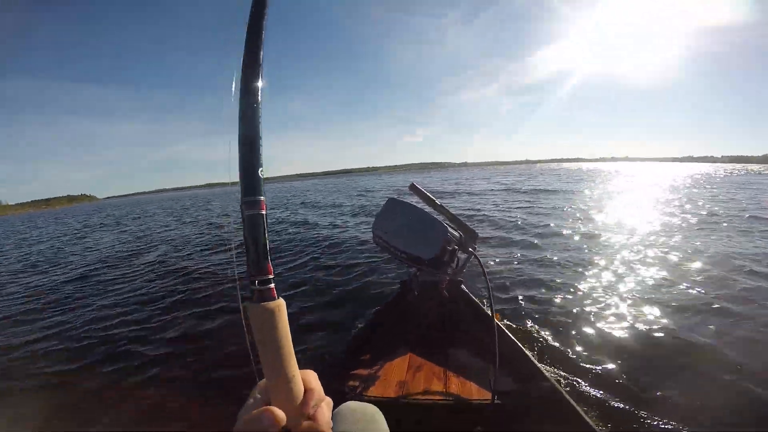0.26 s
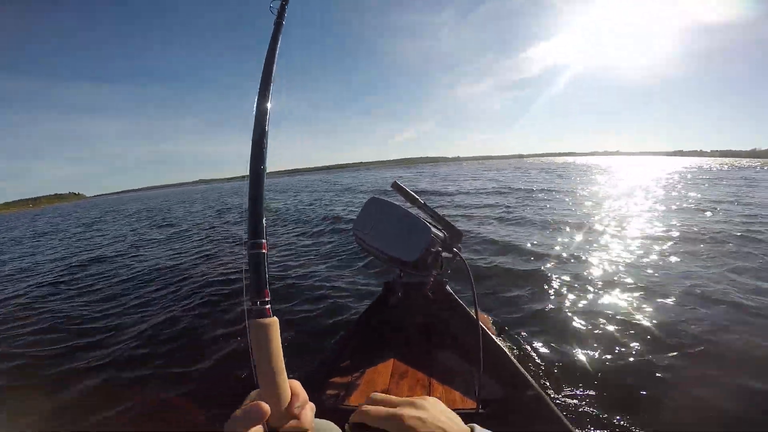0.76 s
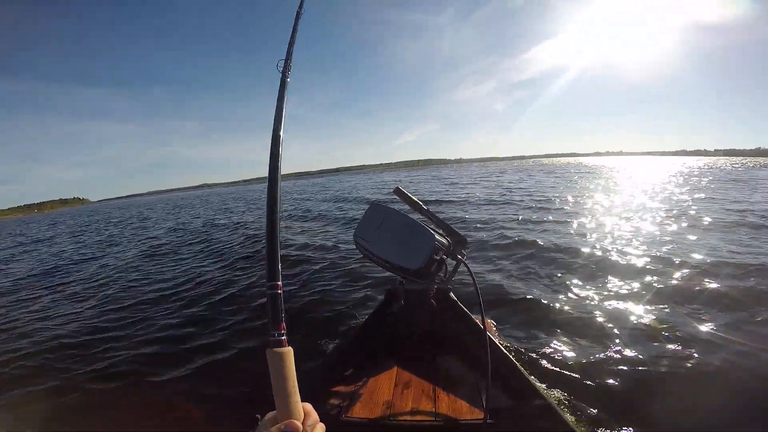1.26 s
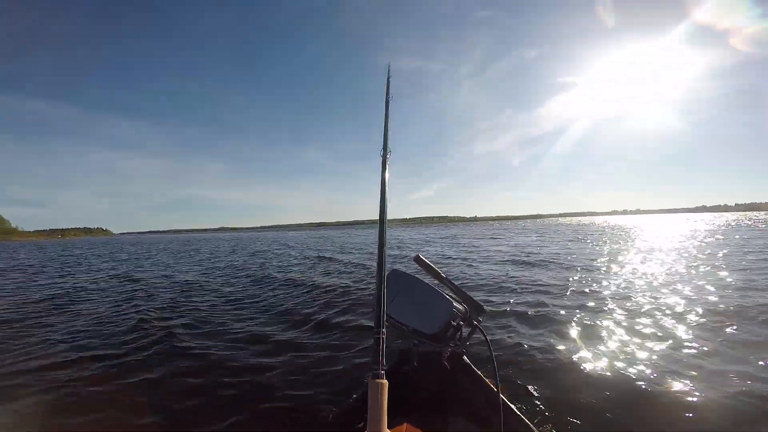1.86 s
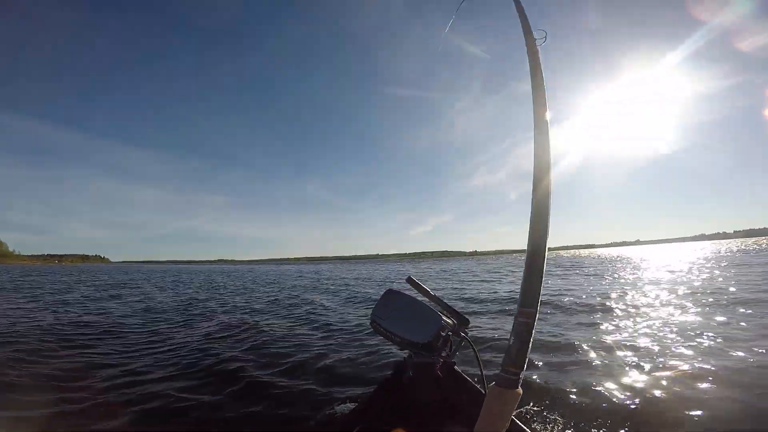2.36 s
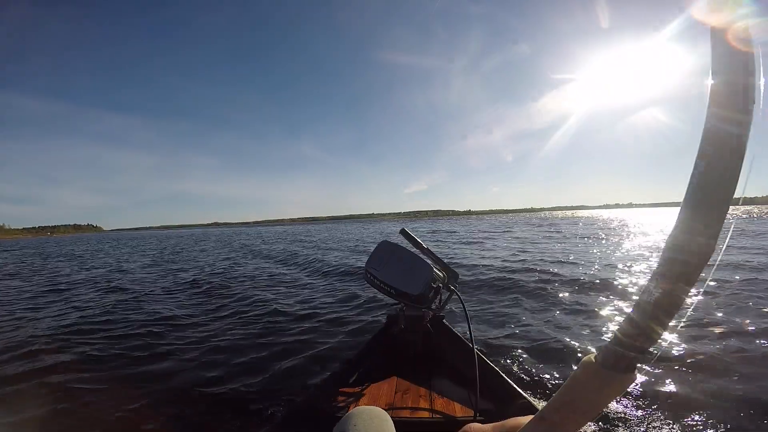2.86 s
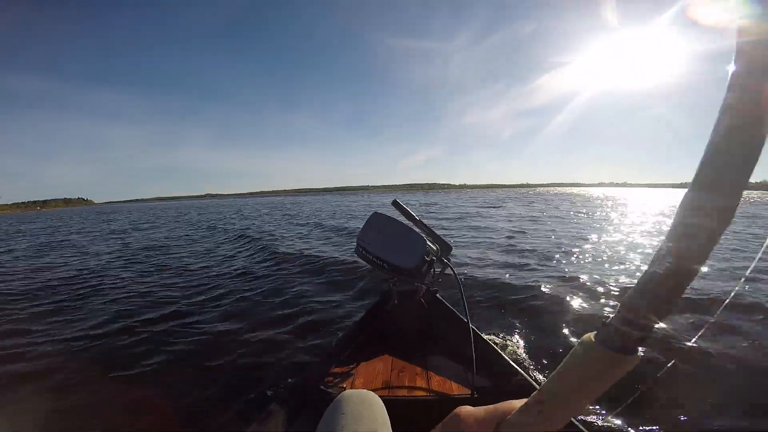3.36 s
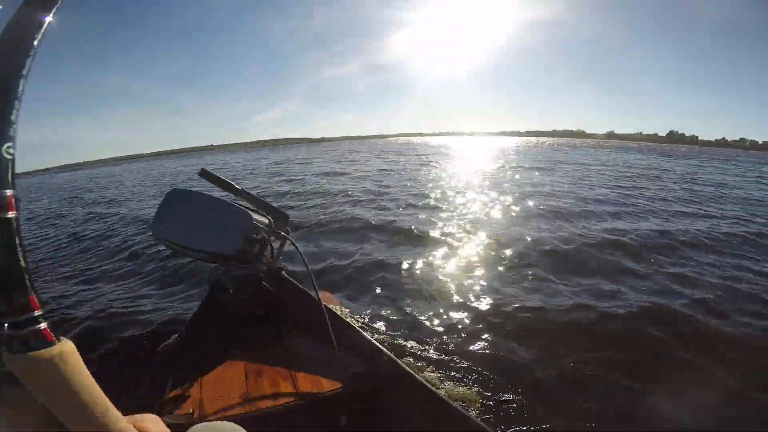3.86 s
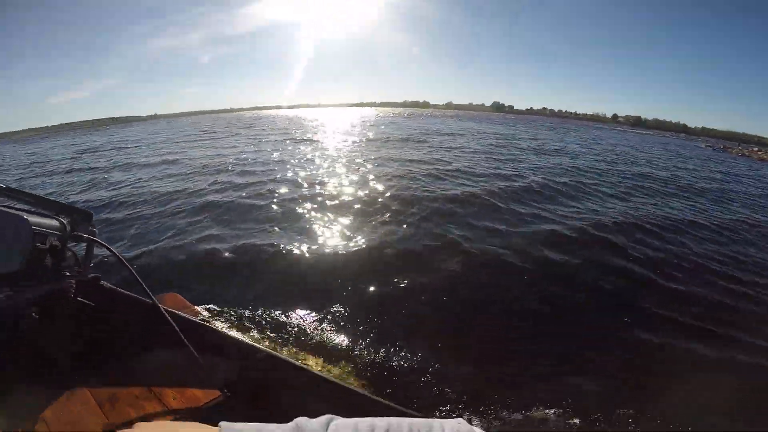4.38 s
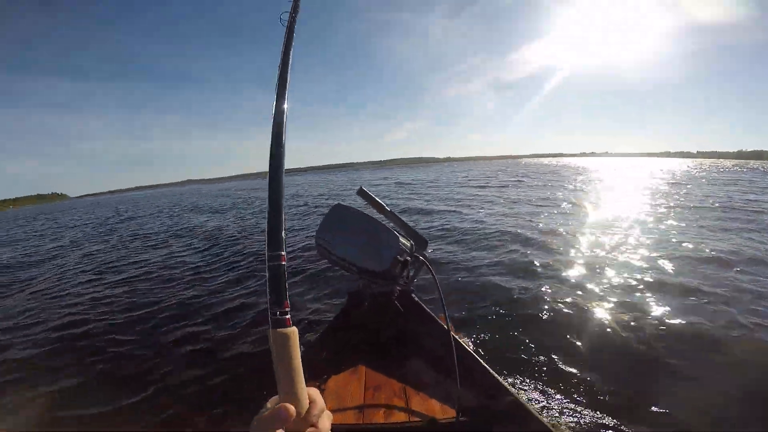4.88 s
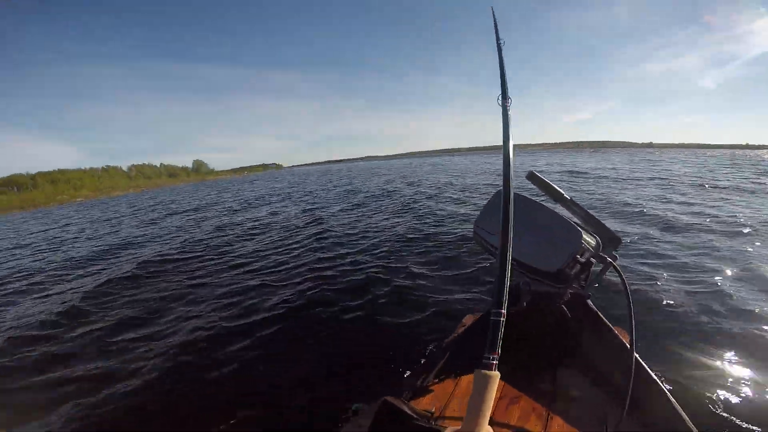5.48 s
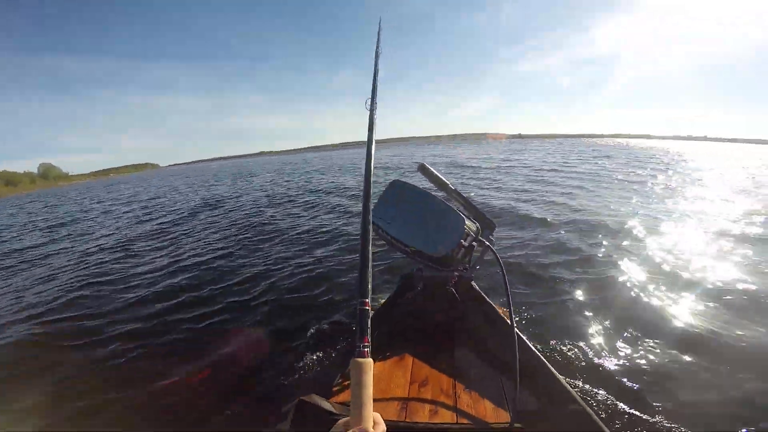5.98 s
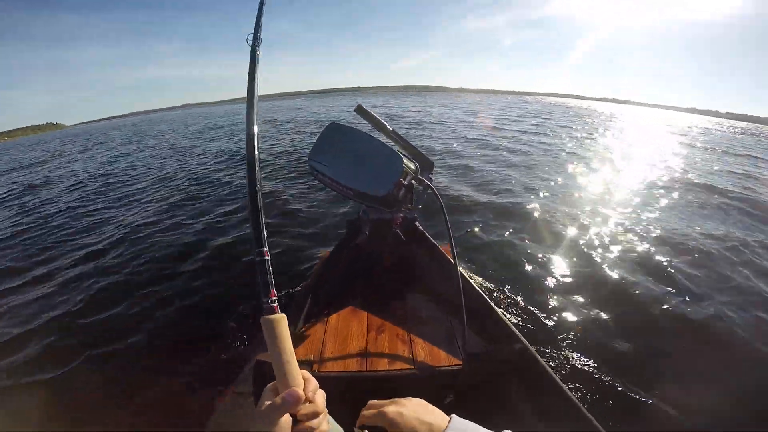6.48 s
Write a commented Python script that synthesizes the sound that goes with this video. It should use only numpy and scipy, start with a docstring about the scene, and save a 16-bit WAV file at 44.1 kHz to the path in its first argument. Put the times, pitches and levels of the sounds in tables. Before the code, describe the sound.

In a small open boat, a fishing reel is cranked close to the microphone, its rapid clicks blending into a bright whirr that surges with each turn. It runs down and rests for a moment, leaving small waves washing softly along the hull, then starts again with a few sharp knocks from the handle. Wind rumbles and thumps on the microphone, gustier and crackling in the second half.

```python
"""Fishing reel in a small open boat

A reel is cranked close by: its pawl clicks over the teeth, ringing reel and camera housing. The whirr
surges with each push of the handle, runs down, rests and restarts; the handle knocks now and then.
Wind rumbles and thumps on the microphone, and crackles and chirps at the camera's edges.
Small waves wash along the hull."""
import sys
import numpy as np
from scipy import signal
from scipy.fft import rfft, irfft, next_fast_len
from scipy.io import wavfile
from scipy.ndimage import uniform_filter1d, map_coordinates

SR = 44100
rng = np.random.default_rng(int(sys.argv[2]) if len(sys.argv) > 2 else 0)


def wrap_up_sound(samples):
    """Save the sound to the file named by the first command line argument, as 16-bit audio."""
    columns = np.atleast_2d(samples).T
    # keep every value between -1 and 1, then stretch to whole-number steps
    tamed = np.clip(columns, -1, 1)
    steps = np.round(tamed * 32767).astype(np.int16)
    wavfile.write(sys.argv[1], SR, steps)


N = 296793

# spells of cranking: start/s, end/s
CRANK_SPELLS = [(0, 2.11), (3.506, 6.425), (6.488, 6.74)]
# handle dead points between pushes: t/s, share of speed lost
DEAD_POINTS = [(.19, .42), (0.381, .32), (.57, .28), (.79, .27), (0.981, .24), (1.18, .24), (1.389, .16),
               (1.62, .22), (2.0, .1), (3.6, .62), (3.781, .22), (3.96, .3), (4.18, .26), (4.39, .2),
               (4.571, .22), (4.78, .08), (4.979, .16), (5.18, .22), (5.371, .28), (5.56, .43), (5.78, .22),
               (6.05, .32), (6.311, .55), (6.67, .46)]
# wind strength: t/s, rumble level/dB, flutter level/dB
WIND_LEVELS = [(0, -14, -48), (.2, -25.5, -51.5), (.5, -16.5, -49), (.8, -21, -50.5), (1.35, -25.5, -53.5),
               (1.58, -18.5, -47.5), (1.85, -22.5, -53.5), (2.2, -34.5, -61.5), (2.65, -35.5, -58.5),
               (3.4, -37.5, -59), (3.72, -28, -56), (3.82, -13.5, -42), (4.08, -30, -50.5),
               (4.25, -14, -41), (4.6, -17, -44), (4.95, -18.5, -47.5), (5.25, -17.5, -47),
               (5.65, -30.5, -56), (5.98, -24, -45.5), (6.282, -32.5, -54), (6.62, -15, -38.5)]
# wind flutter spectrum: f/Hz, level/dB
FLUTTER_SPECTRUM = [(40, 5), (90, 5.5), (170, 2), (260, -4), (400, -9.5), (900, -9), (3000, -15.5)]


def amp(db):
    """Decibels to gain."""
    return 10 ** (np.asarray(db) / 20)


def unit(x):
    """x at rms 1."""
    return x / np.sqrt(np.mean(x ** 2) + 1e-20)


def bump(x, centre, sigma):
    """Gaussian of height 1."""
    return np.exp(-.5 * np.minimum(((x - centre) / sigma) ** 2, 100))


def curves(rows):
    """Each column after the time, interpolated per sample."""
    times, *cols = np.transpose(rows)
    return [np.interp(np.arange(N) / SR, times, col) for col in cols]


def wobble(knots_per_s):
    """Smooth random curve."""
    knots = rng.standard_normal(int(N * knots_per_s / SR) + 4)
    return map_coordinates(knots, [np.arange(N) * knots_per_s / SR])


def filtered(x, response):
    """x filtered by response(hz)."""
    size = 2 * next_fast_len(N // 2 + SR // 4)
    return irfft(rfft(x, size) * response(np.fft.rfftfreq(size, 1 / SR)), size)[:N]


def causal(gain):
    """Minimum-phase response with this gain: rings only after a blow."""
    cepstrum = irfft(np.log(np.maximum(gain, 1e-6)))
    half = len(cepstrum) // 2
    cepstrum[1:half] *= 2
    cepstrum[half + 1:] = 0
    return np.exp(rfft(cepstrum))


def resonances(modes, hz):
    """Gain of steep-sided modes (f/Hz, width/Hz, level/dB)."""
    peaks = (amp(db) / (1 + (2 * (hz - centre) / width) ** 2) for centre, width, db in modes)
    return np.sqrt(sum(peak ** 2 for peak in peaks))


def noise(spectrum):
    """Noise of rms 1 coloured by points (f/Hz, level/dB)."""
    points_hz, db = np.transpose(spectrum)
    gain = lambda hz: amp(np.interp(np.log(hz + 1), np.log(points_hz), db, right=-120))
    return unit(filtered(rng.standard_normal(N), gain))


def crank_rate(linger_s=.036, spin_up_s=.009, run_down_s=.02):
    """Teeth per second: the hand's pace, slowed at dead points and around each rest."""
    # pace before slowing: t/s, rate/(teeth/s)
    pace = [(0, 307), (.3, 271), (.7, 282), (1.1, 262), (1.72, 247), (1.89, 158), (2.1, 128), (3.51, 230),
            (3.9, 266), (4.15, 285), (4.5, 310), (5.3, 275), (6.1, 216), (6.73, 195)]
    t = np.arange(N) / SR
    push = 1 - sum(loss * bump(t, at_s, linger_s) for at_s, loss in DEAD_POINTS)
    for (_, stop), (restart, _) in zip(CRANK_SPELLS, CRANK_SPELLS[1:]):
        rest = np.exp(-np.maximum(stop - t, 0) / run_down_s - np.maximum(t - restart, 0) / spin_up_s)
        push *= 1 - rest
    return np.maximum(curves(pace)[0] * push, 60)


def ratchet(rate_hz, jitter_s=.00019, scatter_db=2, snap=.29, scrape_s=.00056, rattle=.37,
            rattle_s=.0087):
    """The pawl scrapes off each tooth, snaps down and rattles briefly."""
    tooth_s = np.flatnonzero(np.diff(np.floor(np.cumsum(rate_hz) / SR))) / SR
    timing, force, snap_spread = rng.standard_normal((2000, 3))[:len(tooth_s)].T
    t = np.arange(350) / SR
    contact = t / scrape_s * np.exp(1 - t / scrape_s) + rattle * np.exp(-t / rattle_s)
    clicks = contact * rng.standard_normal((len(tooth_s), len(t)))
    clicks[:, round(scrape_s * SR)] += snap * np.exp(snap_spread / 2)
    turning = sum((tooth_s >= start) & (tooth_s < end) for start, end in CRANK_SPELLS)
    onset = np.clip((tooth_s + jitter_s * timing) * SR, 0, N - 1).astype(int)
    size = turning * amp(scatter_db * force) / np.sqrt(rate_hz[onset])
    samples = onset[:, None] + np.arange(len(t))
    return np.bincount(samples.ravel(), (clicks * size[:, None]).ravel(), N)[:N]


def reel(gain_db=-.6, usual_rate_hz=240, loud_db_per_oct=2.5, bright_db_per_oct=1, sway_db=.76,
         ease_s=.04, ease_mode_db=-4, ease_top_db=-1.5):
    """Ratchet clicks ring; their colour swells with each push and shifts as the rod moves."""
    # resonances of reel and camera housing together: f/Hz, width/Hz, level/dB
    click_modes = [(1720, 420, -9), (2460, 500, -16), (2930, 520, -12.5), (3890, 360, -3.8),
                   (4240, 220, -.1), (4870, 290, 1.6), (5370, 190, -.6), (5820, 1200, -7.7),
                   (7050, 540, -.7), (7770, 260, -4.6), (8300, 1600, -6.4), (10200, 900, -16.2),
                   (11570, 560, -19), (12440, 760, -19), (13560, 600, -22.6), (14400, 1500, -21.8)]
    # pitch beamed as the reel turns in the hand: t/s, f/Hz, level/dB
    beam = [(0, 8000, 1.5), (.25, 6900, 2.5), (.9, 7100, 1), (1.5, 7100, 3), (1.75, 5500, 3),
            (2.1, 5100, 4), (3.55, 5400, 9), (3.63, 5350, 7), (3.66, 7900, 6), (3.73, 7900, 8),
            (3.8, 7900, 0), (4, 5800, 3), (4.18, 5950, 7), (4.58, 6300, 9), (4.68, 5500, 3),
            (5.15, 7100, 1.5), (5.25, 8650, 4), (5.8, 8600, 4), (6.1, 7100, 2)]
    # lobes around the beam: f/beam f, width/octaves, share of beam level (negative = shade)
    lobes = [(.69, 0.055, -1.0), (.79, 0.049, -0.58), (1.02, 0.096, 1.08), (1.3, 0.2, -0.55),
             (1.58, 0.059, 0.36), (1.93, .07, -0.24), (2.24, 0.059, 0.2)]
    # rod moving to and from the microphone: t/s, level/dB
    nearness = [(0, -34.5), (.45, -34), (1.1, -36.5), (1.55, -37), (1.75, -37.5), (2.1, -39.5), (3.51, -34),
                (3.72, -31), (4.05, -35.5), (4.35, -36), (4.58, -33.5), (4.72, -36), (5.4, -36),
                (5.95, -36), (6.73, -36.5)]
    rate_hz = crank_rate()
    speed_oct = np.log2(rate_hz / usual_rate_hz)
    ring = unit(filtered(ratchet(rate_hz), lambda hz: causal(resonances(click_modes, hz))))
    hz, t, spectra = signal.stft(ring, SR, nperseg=256)
    hz = hz[:, None] + 1
    beam_s, *cols = np.transpose(beam)
    beam_hz, beam_db = (np.interp(t, beam_s, col) for col in cols)
    offset_oct = np.log2(hz / beam_hz)
    pattern = sum(share * bump(offset_oct, np.log2(ratio), width) for ratio, width, share in lobes)
    colour_db = beam_db * pattern
    # faster teeth strike harder and sizzle more
    top = 1 - 1 / (1 + (hz / 10000) ** 8)
    colour_db += bright_db_per_oct * np.interp(t, np.arange(N) / SR, speed_oct) * top
    # the pawl presses less at dead points: low modes and sizzle fade
    ease = sum(bump(t, at_s, ease_s) for at_s, _ in DEAD_POINTS)
    low_modes = bump(np.log2(hz / 4010), 0, .1)
    colour_db += (ease - ease.mean()) * (ease_mode_db * low_modes + ease_top_db * top)
    # uneven teeth favour different modes from moment to moment
    sway = uniform_filter1d(rng.standard_normal(spectra.shape), size=6, axis=0)
    colour_db += sway_db * unit(uniform_filter1d(sway, size=10, axis=1))
    whirr = signal.istft(spectra * amp(colour_db), SR, nperseg=256)[1][:N]
    return whirr * amp(curves(nearness)[0] + loud_db_per_oct * speed_oct + gain_db)


def rumble(rumble_gain_db=-2, gust_db=2.5, lump_db=3.5):
    """Turbulence rocks the diaphragm slowly, with a lumpy flutter above; gusts swell both."""
    # rumble spectrum: f/Hz, level/dB
    spectrum = [(11, -29), (18, 9.5), (28, 2), (39, -2.5), (92, -31), (130, -80), (170, -81), (290, -120)]
    rumble_db, flutter_db = curves(WIND_LEVELS)
    swing = noise(spectrum)
    # evened out, so gust strength more than chance sizes each swing
    swing /= np.sqrt(np.abs(uniform_filter1d(swing ** 2, SR // 12)) + .059)
    flutter = unit(noise(FLUTTER_SPECTRUM) * amp(lump_db * wobble(45)))
    gusts = amp(gust_db * wobble(14))
    return gusts * (amp(rumble_db + rumble_gain_db) * swing + amp(flutter_db) * flutter)


def water(wash_db=-61, hush_db=-56, ripple_db=3.5, rise_s=.029):
    """Waves wash along the hull over the hush of open water; a last swell marks the reel's restart."""
    # hollow ring of the camera housing, colouring the wash: f/Hz, width/Hz, level/dB
    housing_modes = [(960, 400, -20), (1555, 58, -2.5), (1735, 350, -6.5), (2310, 87, -7), (2950, 410, -6),
                     (3980, 170, -11), (4730, 490, -6.5), (5570, 270, -11.5)]
    # three waves, then a low swell as the reel restarts: t/s, level/dB, cutoff/Hz, decay/s
    swells = [(2.35, -54.5, 6000, 0.022), (2.58, -45.5, 2300, .1), (2.82, -58, 5000, 0.042),
              (3.53, -39, 2600, .055)]
    # open water spectrum: f/Hz, level/dB
    hush_spectrum = [(88, -30), (150, -26), (193, 1), (681, -8.5), (844, -4.5), (1320, -12.5), (1760, 0.5),
                     (2140, -8.5), (2980, -4.5), (4390, -14), (4840, -10), (6110, -18), (15500, -26.5)]
    t = np.arange(N) / SR
    wash = filtered(rng.standard_normal(N), lambda hz: resonances(housing_modes, hz))
    wash = unit(wash * amp(ripple_db * wobble(70)))
    out = amp(wash_db) * wash + amp(hush_db) * noise(hush_spectrum)
    for at_s, db, cutoff_hz, decay_s in swells:
        swell = np.where(t < at_s, bump(t, at_s, rise_s), np.exp(-np.abs(t - at_s) / decay_s))
        out += amp(db) * swell * filtered(wash, lambda hz: 1 / (1 + (hz / cutoff_hz) ** 4))
    return out


def thumps(corner_hz=24, damping=.41, soft_hz=170):
    """Each eddy is a rounded cusp of pressure; the microphone's bass cut swings back after it."""
    # eddies striking the microphone: t/s, relative pressure, rise and decay/s
    eddies = [(0.043, -0.46, 0.017), (.611, -0.44, 0.017), (1.595, 0.97, 0.024), (3.857, 0.47, 0.0034),
              (4.201, -0.61, 0.0047), (4.388, -0.71, 0.0051), (4.457, -0.5, 0.0025), (4.586, -0.6, 0.006),
              (4.643, 0.55, 0.0061), (4.711, -0.13, 0.017), (5.134, -0.8, 0.0055), (6.011, -0.91, 0.0053),
              (6.623, -0.82, 0.0051)]
    t = np.arange(N) / SR
    pressure = sum(peak * np.exp(-np.abs(t - at_s) / tau_s) for at_s, peak, tau_s in eddies)
    bass_cut = lambda s: s ** 2 / (s ** 2 + damping * s + 1) * s / (s + .5)
    return filtered(pressure, lambda hz: bass_cut(1j * hz / corner_hz) / (1 + (hz / soft_hz) ** 2))


def weak_puffs(per_s=7, over_rumble_db=-28, length_s=.014, scatter_db=1.5, bass_scatter_db=4):
    """Rows for puffs(): weak bursts at random times that grow with the wind."""
    timing, size, bass = rng.random((200, 3))[:round(per_s * N / SR)].T
    times = timing * N / SR
    wind_s, rumble_db, _ = np.transpose(WIND_LEVELS)
    levels_db = np.interp(times, wind_s, rumble_db) + over_rumble_db + scatter_db * (2 * size - 1)
    bass_db = bass_scatter_db * (2 * bass - 1)
    return [(*row, length_s) for row in zip(times, levels_db, bass_db)]


def puffs(crackle_gain_db=-3.5, bass_gain_db=-4.5, rough_db=3):
    """Air tears at the camera's edge in short crackling bursts."""
    # strongest puffs: t/s, level/dB, bass offset/dB, length/s
    strong_puffs = [(0.047, -44, -4, 0.018), (0.39, -43, -9, 0.015), (0.616, -47, -5, 0.011),
                    (1.447, -53, -4, 0.024), (1.635, -46, -4, 0.016), (1.829, -47.5, 6, 0.016),
                    (3.795, -32, 3, 0.037), (3.849, -32, 8.5, 0.019), (4.2, -44.5, 12, 0.023),
                    (4.238, -37.5, 6, 0.02), (4.295, -37, -3, 0.027), (4.391, -35, 8.5, 0.028),
                    (4.456, -26, 1.5, 0.044), (4.58, -35, 8.5, .028), (4.62, -28.5, 6, 0.039),
                    (4.701, -30.5, -5, 0.0078), (4.815, -32.5, 5.5, 0.017), (5, -36, 1, 0.03),
                    (5.132, -36, 7.5, 0.019), (5.19, -36.5, -12, 0.018), (5.27, -37.5, -8, 0.012),
                    (5.83, -42, 8.5, 0.029), (5.998, -39, 8, 0.034), (6.5, -40, 3, 0.018),
                    (6.547, -37.5, 7.5, 0.022), (6.619, -37, 2, 0.035)]
    # crackle spectrum: f/Hz, level/dB
    spectrum = [(150, 11.5), (280, -4), (420, -6), (600, 10.5), (800, -12.5), (1100, 8.5), (1500, -6),
                (2100, -3), (2700, -1.5), (3500, -4.5), (6000, -24)]
    t, tear, bass = np.arange(N) / SR, np.zeros(N), np.zeros(N)
    for at_s, db, bass_db, length_s in list(strong_puffs) + weak_puffs():
        near = slice(*np.searchsorted(t, [at_s - 2 * length_s, at_s + 2 * length_s]))
        burst = amp(db) * bump(t[near], at_s, .37 * length_s)
        tear[near] += burst
        bass[near] += burst * amp(bass_db)
    crackle = unit(noise(spectrum) * amp(rough_db * wobble(400)))
    return amp(crackle_gain_db) * tear * crackle + amp(bass_gain_db) * bass * noise(FLUTTER_SPECTRUM)


def chirps(sigma_s=.0029, waver=.098, edge_hz=2560, edge_db=-5.5):
    """Edge tones: milliseconds of unsteady whistle, each joined by the same high tone."""
    # gusts across the camera's edges: t/s, f/Hz, level/dB
    whistles = [(.048, 1630, -38.5), (.392, 1353, -40.5), (.616, 1420, -44), (.695, 1606, -40),
                (1.119, 1530, -43), (1.448, 1307, -40), (1.634, 1620, -38.5), (1.834, 1233, -41.5),
                (4.017, 1390, -37.5), (4.236, 1230, -32.5), (4.471, 1460, -26.5), (4.573, 2626, -34.5),
                (4.617, 1605, -28), (4.702, 2436, -36), (4.815, 2513, -35), (5.187, 1388, -35.5),
                (5.268, 1308, -38.5), (6.001, 2589, -40), (6.435, 1504, -40), (6.51, 2575, -40.5)]
    t, out = np.arange(N) / SR, np.zeros(N)
    drift = 1 + waver * wobble(700)
    for at_s, hz, db in whistles:
        near = np.abs(t - at_s) < 4 * sigma_s
        rad_per_hz = 2 * np.pi * np.cumsum(drift[near]) / SR
        whistle = np.sin(hz * rad_per_hz) + amp(edge_db) * np.sin(edge_hz * rad_per_hz)
        out[near] += np.sqrt(2) * amp(db) * bump(t[near], at_s, sigma_s) * whistle
    return out


def knocks(gain_db=-5, scatter_db=2, crack_gain=.57, crack_t60_s=.0058, cutoff_hz=10500):
    """Play in the handle: a dry crack and a few brief modes."""
    # handle knocks and ticks: t/s, level/dB, f/Hz
    hits = [(.978, -21, 5350), (1.478, -20, 5200), (2.062, -32, 1975), (2.101, -31, 4900),
            (2.221, -35, 1720), (3.399, -39, 1860), (3.449, -41, 1495), (3.548, -24, 5300),
            (3.795, -24, 4100), (3.844, -14, 3602), (4.404, -17.5, 2800), (4.438, -10, 3100),
            (4.601, -13, 2650), (4.631, -12, 2790), (6.462, -34, 2650), (6.659, -22, 2592),
            (6.695, -12, 3020)]
    # modes of a knock: f/knock f, level/dB, t60/s
    modes = [(1, -6, 0.016), (1.24, 0, 0.0031), (1.9, 0, 0.0022), (2.9, 3, 0.0018)]
    out, t = np.zeros(N + SR), np.arange(SR // 20) / SR
    for at_s, db, hz in hits:
        ring = np.zeros(len(t))
        for ratio, mode_db, t60_s in modes:
            decay = amp(mode_db + scatter_db * rng.normal() - 60 * t / t60_s)
            ring += decay * np.sin(2 * np.pi * hz * ratio * t)
        crack = crack_gain * rng.standard_normal(len(t)) * amp(-60 * t / crack_t60_s)
        out[round(at_s * SR):][:len(t)] += amp(db + gain_db) * (ring + crack)
    return filtered(out[:N], lambda hz: 1 / (1 + (hz / cutoff_hz) ** 8))


def scene():
    """Reel, wind and water at one microphone."""
    return (water() + rumble() + thumps() + knocks() + reel() + puffs() + chirps())[None]


def record(dry):
    """The camera passes nothing above its band limit."""
    limit_hz = 15400
    return filtered(dry[0], lambda hz: hz < limit_hz)[None]


dry = scene()
out = record(dry)
wrap_up_sound(out)
```